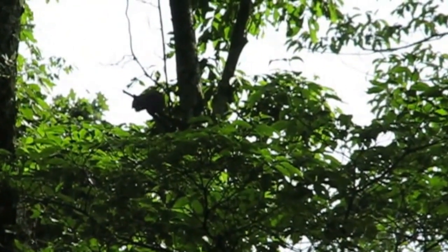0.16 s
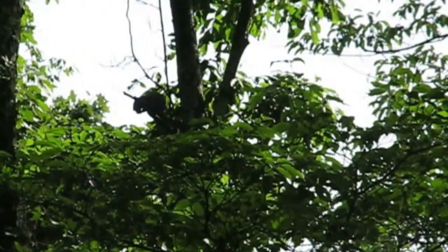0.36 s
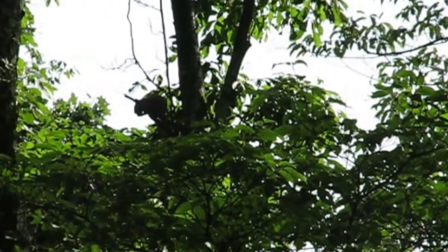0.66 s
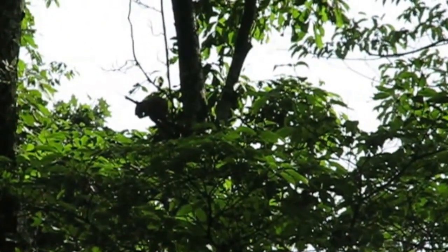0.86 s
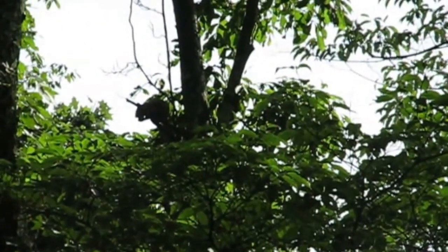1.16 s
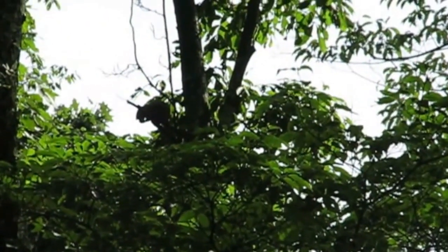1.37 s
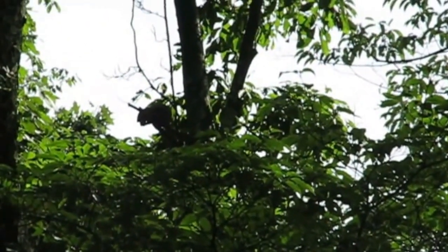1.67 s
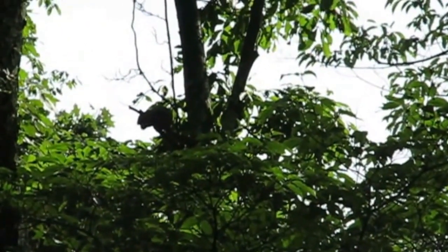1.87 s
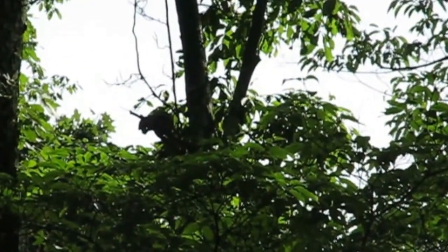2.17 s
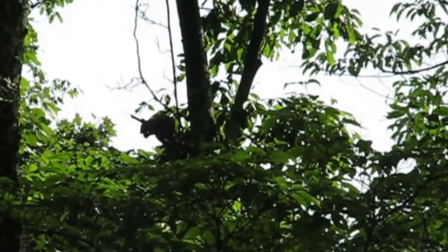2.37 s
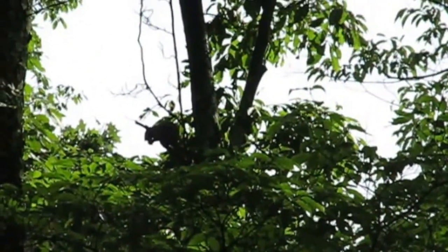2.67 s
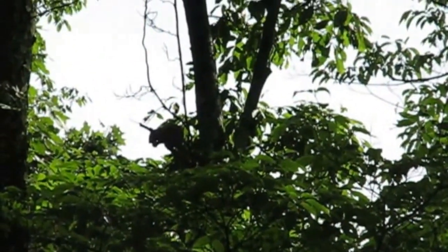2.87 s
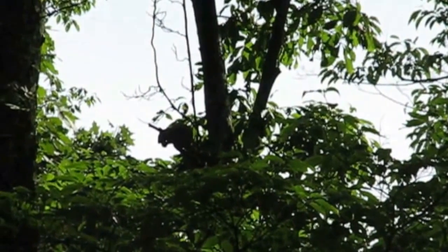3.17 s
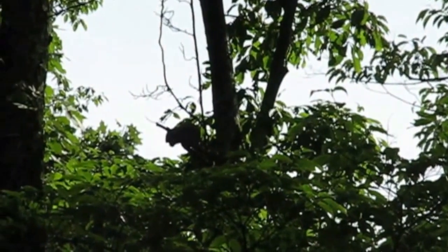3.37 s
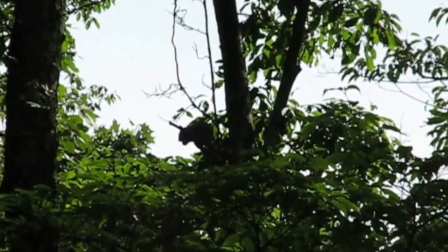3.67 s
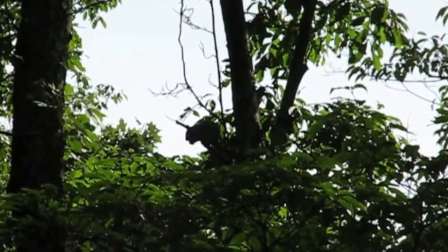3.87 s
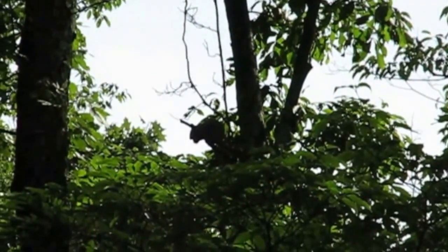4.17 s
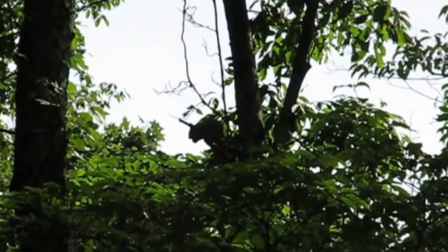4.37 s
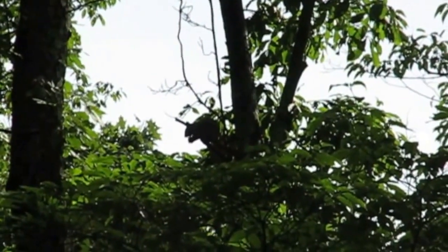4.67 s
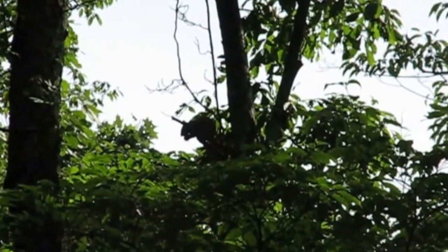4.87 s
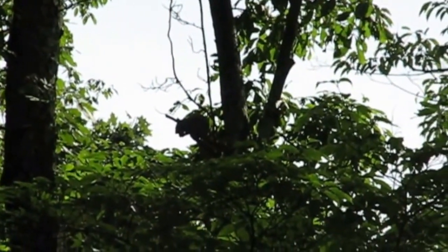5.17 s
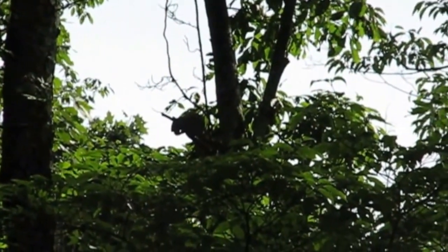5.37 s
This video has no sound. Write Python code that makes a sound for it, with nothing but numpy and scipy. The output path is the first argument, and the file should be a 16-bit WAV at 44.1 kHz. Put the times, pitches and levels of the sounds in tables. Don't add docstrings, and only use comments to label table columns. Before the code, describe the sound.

Quiet summer woods heard through a handheld stereo camera microphone. Throughout, soft low air with faint distant hum lies under a fine insect hiss around 6 to 8 kHz, and a cicada near 4.7 kHz swells softly every 0.35 seconds or so, each pulse sinking slightly in pitch. Faint crickets chirp evenly near 6 kHz. Barely audible low dove coos come at 0.45, 1.6 and 2.7 seconds, with a fainter high note at 4.0. From 0.7 a tree cricket on the right warms up, rising strongly after 1.5 into a rapid 26-per-second trill near 7.4 kHz. Fingers rub, tick and give a tiny squeak at 1.8 to 1.9, then tick at 2.44. Sound drops out completely from 2.45 to 2.58; insects return without the trill. A tiny bright click at 4.43 and close rubbing knocks at 4.55 to 4.63 precede two short, arched, echoing bird hoots near 1.5 kHz at 4.8 and 5.2.

```python
import sys
import numpy as np
from scipy import signal
from scipy.fft import rfft, irfft, next_fast_len
from scipy.io import wavfile
from scipy.ndimage import uniform_filter1d, map_coordinates

SR = 44100
rng = np.random.default_rng(int(sys.argv[2]) if len(sys.argv) > 2 else 0)


def makeup_ratio(level_db):
    decades = np.asarray(level_db, float) / 20
    return 10 ** decades


def inscribe(sig):
    pcm = np.round(np.clip(np.atleast_2d(sig).T, -1, 1) * 32767)
    wavfile.write(sys.argv[1], SR, pcm.astype(np.int16))


N = 243431


def unit(x):
    return x / np.sqrt(np.mean(x ** 2) + 1e-20)


def along(points, hz):
    f, v = np.transpose(points)
    return np.interp(np.log(hz + 1), np.log(f + 1), v)


def curves(rows):
    s, *cols = np.transpose(rows)
    return [np.interp(np.arange(N) / SR, s, c) for c in cols]


def wobble(rate_hz):
    knots = rng.standard_normal(int(N * rate_hz / SR) + 4)
    return map_coordinates(knots, [np.arange(N) * rate_hz / SR])


def filtered(x, response):
    m = next_fast_len(N + SR // 2)
    return irfft(rfft(x, m) * response(np.fft.rfftfreq(m, 1 / SR)), m)[..., :N]


def ringing(x, hz, width_hz):
    def resonance(f):
        damping = 1j * f * width_hz
        return (damping / (hz * hz - f * f + damping)) ** 2
    return unit(filtered(x, resonance))


def clicks(rate_hz, scatter_db):
    chance, size = rng.random((2, N)), rng.standard_normal((2, N))
    sign = np.sign(rng.random((2, N)) - 0.5)
    return (chance < rate_hz / SR) * sign * makeup_ratio(scatter_db * size)


def sides(left_minus_right_db):
    return makeup_ratio(np.array([left_minus_right_db / 2, -left_minus_right_db / 2]))


def echoes(x, t60_s):
    t = np.arange(SR) / SR
    tail = rng.standard_normal((2, SR)) * makeup_ratio(-60 * t / t60_s)
    return signal.fftconvolve(x[None], tail / np.linalg.norm(tail[0]), axes=1)[:, :N]


# [freq_hz, density_db_per_hz]
WOODS_COLOUR = [(12, -36), (20, -20.5), (140, -14.5), (300, -14.5), (600, -17), (1200, -19), (2650, -23),
                (3600, -17), (4700, -14.5), (5500, -21.5), (7000, -24), (9300, -27), (12000, -28.5),
                (15800, -32)]
# [freq_hz, correlation_0_1]
WOODS_LIKENESS = [(30, 0.85), (250, 0.82), (600, 0.59), (1200, 0.52), (2000, 0.12), (15000, 0.028)]
# [freq_hz, left_minus_right_db]
WOODS_BALANCE = [(60, 0), (350, -2), (700, 1), (3000, -1.7), (9500, -2.5), (12000, 1.5), (15000, 1)]
# [pitch_hz, width_hz, level_db]
HUMS = [(57.5, 8, -76.5), (119.1, 15, -79.5), (200.8, 7.3, -73.5), (353.5, 13, -81.5)]


def woods():
    def mid_side(hz):
        angle = np.arccos(np.clip(along(WOODS_LIKENESS, hz), -1, 1)) / 2
        return makeup_ratio(along(WOODS_COLOUR, hz)) * [np.cos(angle), np.sin(angle)]
    mid, side = filtered(rng.standard_normal((2, N)), mid_side)
    air = filtered(np.array([mid + side, mid - side]), lambda hz: sides(along(WOODS_BALANCE, hz)))
    hum = sum(makeup_ratio(db) * ringing(rng.standard_normal(N), hz, width_hz) for hz, width_hz, db in HUMS)
    return makeup_ratio(-56.5 + 0.82 * wobble(2.88)) * unit(air) + hum


# [freq_hz, density_db_per_hz]
CROWD_SPECTRUM = [(3060, -46), (5200, -15), (5800, -15), (6090, -6.5), (6310, -1.5), (7730, 2), (8250, -8),
                  (8670, -21), (9280, -24), (10500, -32.5), (13600, -53), (22000, -120)]
# [freq_hz, left_minus_right_db]
CROWD_BALANCE = [(5000, -0.5), (6200, 2), (7000, -7), (7600, -7), (8400, -14), (10000, -2.5)]


def crowd():
    pair = clicks(12000, scatter_db=1)
    late = np.roll(pair[::-1], shift=3, axis=1)
    pair = pair + 0.24 * late * [[1], [0]]
    z = signal.stft(pair, nperseg=256)[2]
    patches = uniform_filter1d(rng.standard_normal(z.shape), size=4, axis=1)
    patches = uniform_filter1d(patches, size=6, axis=2)
    pair = signal.istft(z * makeup_ratio(0.98 * unit(patches)), nperseg=256)[1][:, :N]
    pair = filtered(pair, lambda hz: makeup_ratio(along(CROWD_SPECTRUM, hz)) * sides(along(CROWD_BALANCE, hz)))
    return makeup_ratio(-42.5 + 0.29 * wobble(4.66)) * unit(pair)


# [peak_s, peak_db]
CICADA_SWELLS = [(-.03, -60), (0.543, -61.5), (.83, -60.5), (1.27, -62), (1.61, -61.5), (1.915, -59.5),
                 (2.28, -62.5), (2.63, -58.5), (2.984, -57.5), (3.382, -60.5), (3.71, -59), (4.11, -58),
                 (4.467, -58), (4.81, -58), (5.207, -60), (5.54, -59)]
# [pitch_hz, width_hz, level_db, lag_s]
CICADA_BODY = [
    (4842, 83, -1.5, -.005),
    (4690, 170, -2, 0.017),
    (4485, 170, -7.5, .07),
]
SWELL_HALF_S = 0.07


def cicada():
    t = np.arange(N) / SR
    song = 0
    for hz, width_hz, level_db, lag_s in CICADA_BODY:
        effort = sum(makeup_ratio(db) * np.exp(-0.5 * ((t - s - lag_s) / SWELL_HALF_S) ** 2)
                     for s, db in CICADA_SWELLS)
        song = song + makeup_ratio(level_db) * effort * ringing(clicks(1500, scatter_db=4.5), hz, width_hz)
    return sides(-3.0)[:, None] * song


# [first_chirp_s, last_chirp_s, period_s, pitch_hz, level_db]
FAR_CRICKETS = [
    (.222, 2.3, .344, 6030, -58.5),
    (.19, 2.42, .316, 6158, -59.5),
    (2.77, 5.45, .292, 6225, -61.5),
]
CHIRP_S, CHIRP_EDGE_S, WAVER_HZ = 0.14, 0.03, 22


def crickets():
    t, out = np.arange(N) / SR, 0
    for first_s, last_s, period_s, hz, db in FAR_CRICKETS:
        half_s = period_s / 2
        since_s = np.clip(t, first_s - half_s, last_s + half_s) - first_s
        off_s = np.abs((since_s + half_s) % period_s - half_s)
        singing = (t > first_s - half_s) * (t < last_s + CHIRP_S / 2)
        gate = np.clip((CHIRP_S / 2 - off_s) / CHIRP_EDGE_S + 0.5, 0, 1) * singing
        gate = gate * makeup_ratio(0.72 * wobble(3))
        pitch_hz = hz + WAVER_HZ * np.array([wobble(60), wobble(60)])
        note = np.sin(2 * np.pi * np.cumsum(pitch_hz, axis=1) / SR)
        out = out + makeup_ratio(db) * gate * note * makeup_ratio(4 + 2.8 * wobble(70))
    return out * sides(-2)[:, None]


# [start_s, pitch_hz, level_db]
DOVE_COOS = [
    (0.453, 512, -66),
    (1.586, 509, -67),
    (2.72, 514, -68.5),
    (4.018, 1483, -75),
]
COO_S = 0.4


def dove():
    t, out = np.arange(N) / SR, 0
    for s, hz, db in DOVE_COOS:
        swell = np.sin(np.pi * np.clip((t - s) / COO_S, 0, 1)) ** 0.3
        out = out + makeup_ratio(db) * swell * np.sin(2 * np.pi * hz * t + 0.89 * wobble(11))
    return out


# [time_s, level_db]
TRILL_EFFORT = [
    (.7, -60),
    (1.1, -55.5),
    (1.5, -52),
    (1.62, -46),
    (2.45, -44),
]
TRILL_TOP_HZ, TRILL_HZ_PER_DB, FULL_EFFORT_DB = 7420, 10.5, -44


def trill():
    db, = curves(TRILL_EFFORT)
    hz = TRILL_TOP_HZ + TRILL_HZ_PER_DB * (db - FULL_EFFORT_DB)
    t = np.arange(N) / SR
    beat = 25.9 * (t - 2.366) + 0.05 * wobble(6)
    stroke = np.exp(1.8 * (np.cos(2 * np.pi * beat) - 1)) * makeup_ratio(1.8 * wobble(25))
    note = np.sin(2 * np.pi * np.cumsum(hz + 14 * wobble(40)) / SR)
    heard = (t > TRILL_EFFORT[0][0]) * (t < DROPOUT[2][0])
    song = makeup_ratio(db + 1.5) * stroke * note * heard
    return song * sides(-11)[:, None] + makeup_ratio(-7) * echoes(song, t60_s=0.1)


# [start_s, length_s, pitch_hz, level_db]
SHELL_RUSTLES = [
    (0.93, 0.072, 250, -66),
    (1.856, 0.083, 400, -61),
    (1.876, 0.16, 110, -66.5),
    (2.369, .02, 900, -64),
    (2.433, 0.018, 1100, -58),
    (3.266, 0.074, 399.5, -68),
    (4.54, 0.088, 850, -60),
    (4.583, 0.095, 550, -61),
    (4.6, .11, 254, -64),
]
RUSTLE_WIDTH = 1.1


def rustles():
    t, out = np.arange(N) / SR, 0
    for s, length_s, hz, db in SHELL_RUSTLES:
        stroke = np.sin(np.pi * np.clip((t - s) / length_s, 0, 1))
        grains = clicks(1600, scatter_db=3)[0]
        out = out + makeup_ratio(db) * stroke * ringing(grains, hz, RUSTLE_WIDTH * hz)
    return out


# [start_s, peak_db, pitch_hz, left_minus_right_db]
FINGER_TICKS = [(1.821, -50.5, 500, 0), (1.886, -52, 1810, 0), (1.897, -50, 452, -3),
                (2.439, -49.5, 2100, -17), (4.426, -46, 11200, 0), (4.427, -52, 12300, 0),
                (4.558, -42.5, 815, 9.5), (4.578, -42, 810, 15), (4.61, -48, 552, 0),
                (4.621, -45.5, 220, 1), (4.634, -55, 264, 0)]
TICK_T60_S, T60_FALLS = 0.019, 0.36


def finger_ticks():
    out, t = np.zeros((2, N + SR)), np.arange(SR // 5) / SR
    for s, db, hz, pan_db in FINGER_TICKS:
        puff = uniform_filter1d(rng.standard_normal(len(t)), size=8)
        ring = np.sin(2 * np.pi * hz * t) + 0.47 * puff
        t60_s = TICK_T60_S * (800 / hz) ** T60_FALLS
        blow = makeup_ratio(db - 60 * t / t60_s) * (1 - np.exp(-t / 0.00065)) * ring
        out[:, round(s * SR):][:, :len(t)] += sides(pan_db)[:, None] * blow
    return out[:, :N]


# [start_s, length_s, pitch_hz, peak_db, left_minus_right_db]
FINGER_SQUEAK = (1.8922, .0075, 1700, -37, -6)


def squeak():
    s, length_s, hz, db, pan_db = FINGER_SQUEAK
    u = (np.arange(N) / SR - s) / length_s
    release = makeup_ratio(-150 * np.clip(u - 1, 0, 9))
    grip = np.where(u < 1, np.clip(u, 0, 1) ** 0.7, release)
    phase = 2 * np.pi * hz * length_s * u
    tone = np.sin(phase) + 0.5 * np.sin(1.17 * phase)
    return sides(pan_db)[:, None] * makeup_ratio(db - 7.5) * grip * tone


# [start_s, level_db]
BIRD_HOOTS = [
    (4.777, -53),
    (5.161, -52),
]
HOOT_TOP_HZ, HOOT_DEPTH_HZ, HOOT_RISE_S, HOOT_FALL_S = 1497, 310, 0.044, 0.056
RISE_BEND, FALL_BEND, HOOT_DB_PER_HZ = 2.8, 2.3, 0.045


def hoots():
    t, call = np.arange(N) / SR, np.zeros(N)
    for s, db in BIRD_HOOTS:
        before = (s + HOOT_RISE_S - t) / HOOT_RISE_S
        after = (t - s - HOOT_RISE_S) / HOOT_FALL_S
        flat_hz = HOOT_DEPTH_HZ * (np.clip(before, 0, 1) ** RISE_BEND + np.clip(after, 0, 1) ** FALL_BEND)
        gain = makeup_ratio(db + 1 - HOOT_DB_PER_HZ * flat_hz + 3 * wobble(110)) * (before < 1) * (after < 1)
        call += gain * np.sin(2 * np.pi * np.cumsum(HOOT_TOP_HZ - flat_hz) / SR)
    trunk = makeup_ratio(-4) * np.roll(call, round(0.018 * SR))
    slope = makeup_ratio(-8) * np.roll(call, round(0.09 * SR))
    near = call + trunk + makeup_ratio(-6) * echoes(call + slope, t60_s=0.2)
    far = makeup_ratio(-2.5 + 3.5 * wobble(45)) * echoes(call + slope, t60_s=1.6)
    return near + far


def scene():
    insects = crowd() + cicada() + crickets() + trill()
    birds = dove() + hoots()
    handling = rustles() + finger_ticks() + squeak()
    return woods() + insects + birds + handling


# [time_s, gain_0_1]
DROPOUT = [
    (2.4445, 1),
    (2.448, 0),
    (2.579, 0),
    (2.59, 1),
]


def dropout(x):
    return x * curves(DROPOUT)[0]


def top_cut(x):
    return signal.sosfilt(signal.butter(12, 16570, fs=SR, output="sos"), x)


def record(dry):
    mix = filtered(dropout(dry), lambda hz: hz < 15770)
    return top_cut(mix)


dry = scene()
out = record(dry)
inscribe(out)
```